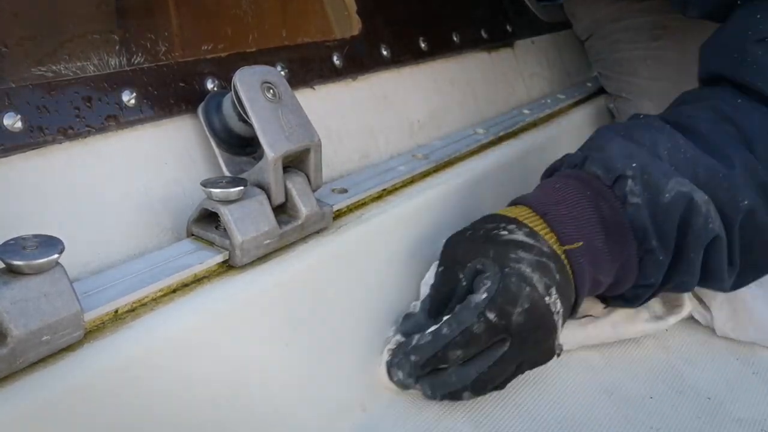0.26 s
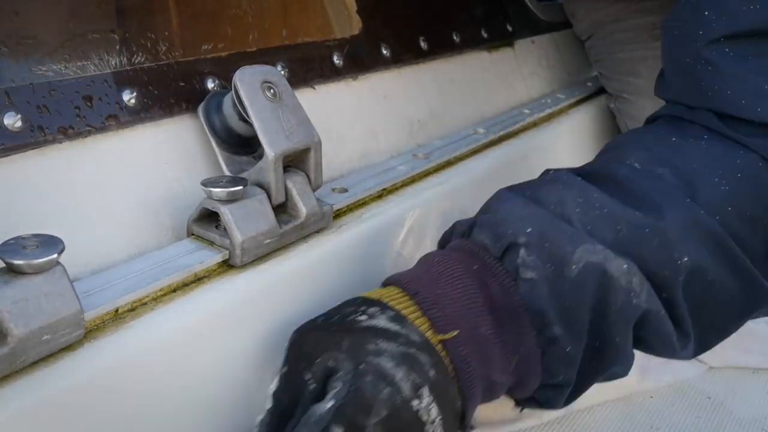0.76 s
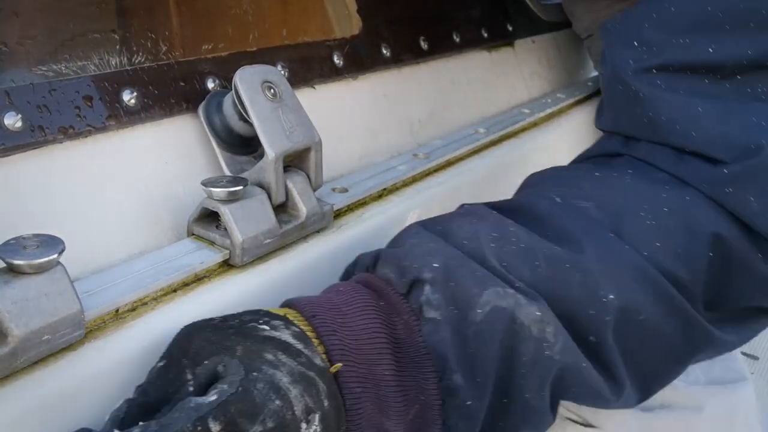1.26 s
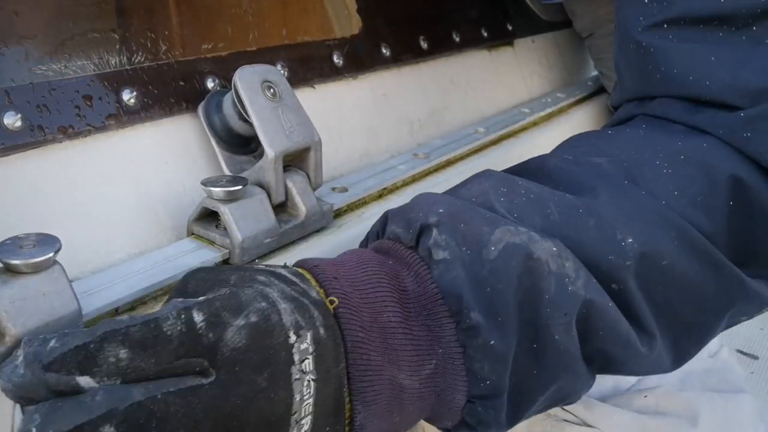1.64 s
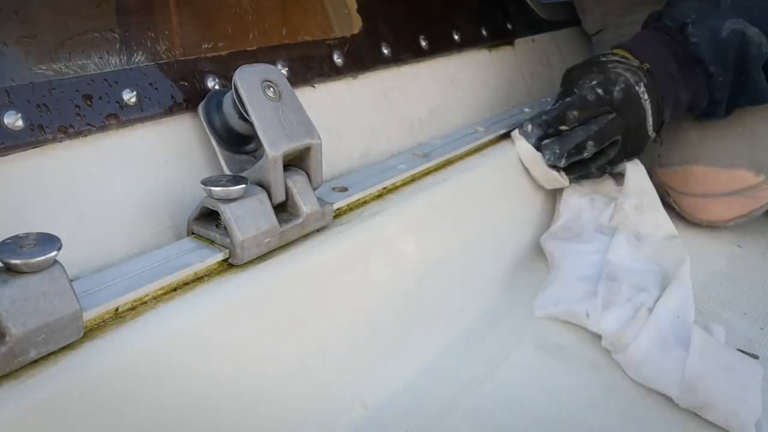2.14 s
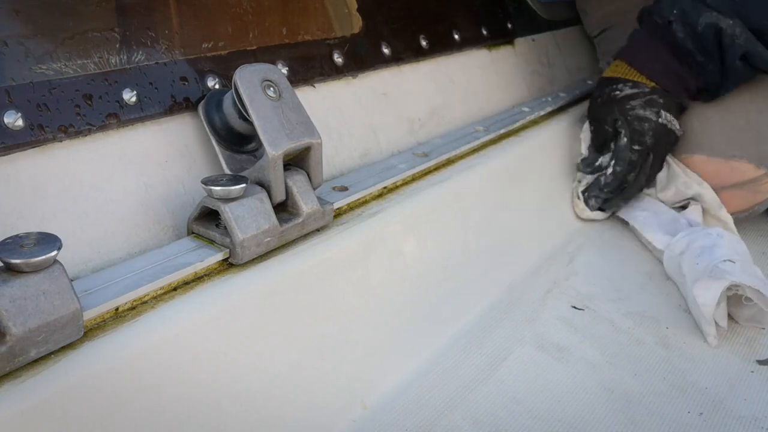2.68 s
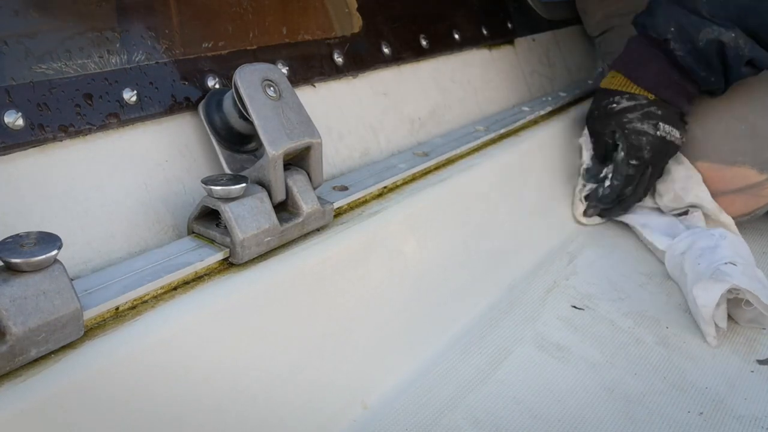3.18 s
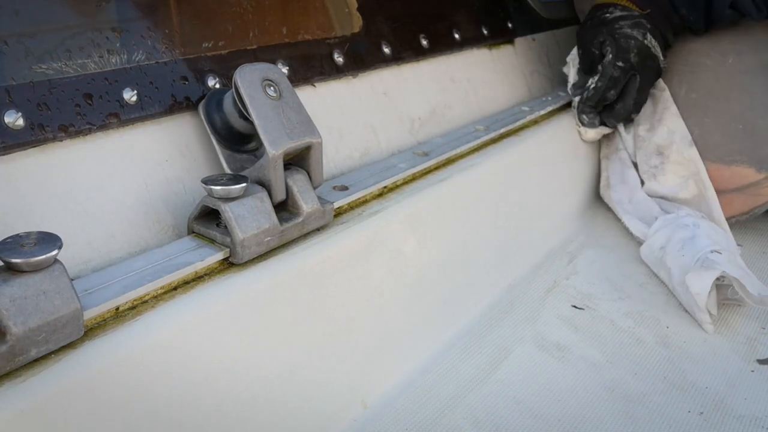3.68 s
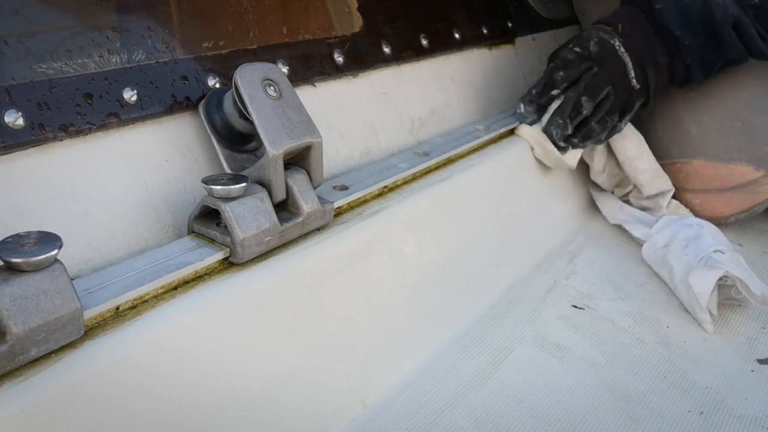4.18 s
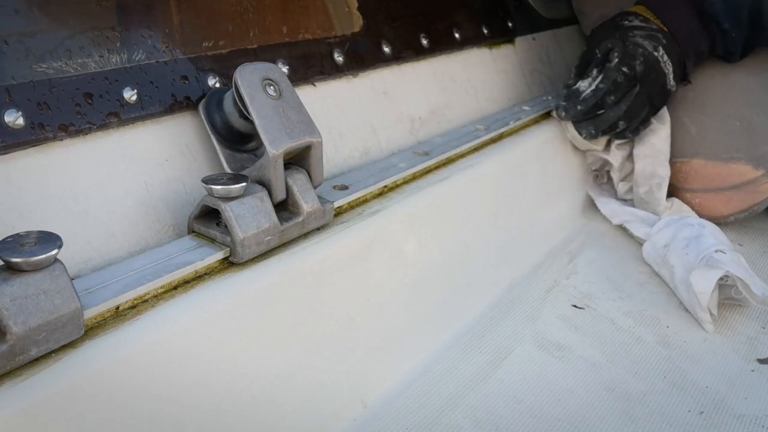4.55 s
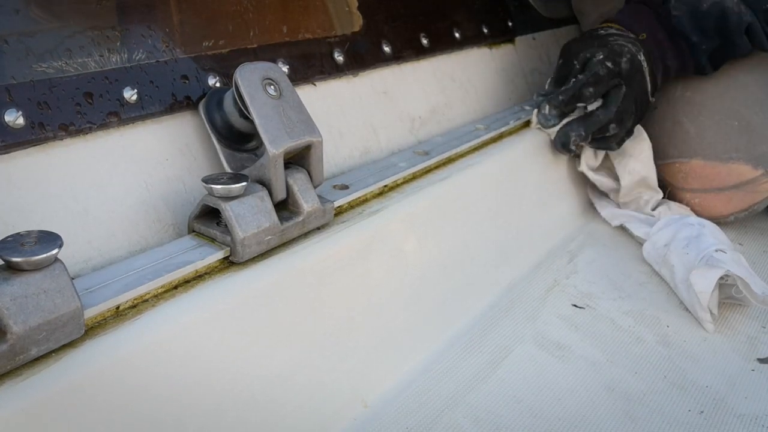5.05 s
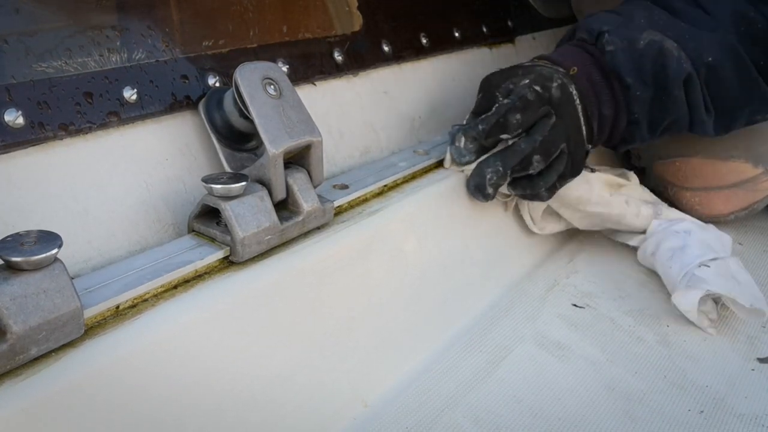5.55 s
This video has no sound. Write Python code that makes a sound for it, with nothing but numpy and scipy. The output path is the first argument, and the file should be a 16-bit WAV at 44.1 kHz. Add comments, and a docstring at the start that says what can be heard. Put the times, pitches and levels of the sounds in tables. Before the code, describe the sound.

A gloved hand rubs a cloth with polishing paste over a boat's fibreglass deck in short, uneven, hissing strokes. The cloth squeaks faintly at first. The hand then bumps the hollow deck, clinks against a metal track and makes one sharp click while the scrubbing carries on. It is heard from very close, outdoors, over a low harbour rumble and light wind on the microphones.

```python
"""On a boat's fibreglass deck in harbour, a small camera's two microphones close to a gloved hand.
The hand scrubs with a cloth and polishing paste: the grit hisses, the cloth drags, the panel groans
and the weave squeaks, mostly on the first strokes. The hand knocks the deck and a metal track.
Hull and harbour rumble underneath, wind buffets the microphones and a few thin whistles pass.
Each microphone port rings at its own pitch."""
import sys
import numpy as np
from scipy import signal
from scipy.fft import rfft, irfft, next_fast_len
from scipy.io import wavfile
from scipy.ndimage import uniform_filter1d, map_coordinates

SR = 44100
rng = np.random.default_rng(int(sys.argv[2]) if len(sys.argv) > 2 else 0)


def to_wav(s):
    """Save 16-bit WAV."""
    ch = np.atleast_2d(s).T  # columns
    pcm = np.round(np.clip(ch, -1, 1) * 32767)  # PCM
    wavfile.write(sys.argv[1], SR, pcm.astype(np.int16))


N = 256656

# hum of the hull, and wind on the microphones, over time: t/s, level/dB
HULL_LEVELS = [(0.0, -55.5), (0.88, -58), (1.13, -54.5), (1.28, -56), (2.04, -57), (3.03, -55.5),
               (3.55, -56.5), (4.97, -55), (5.82, -55.5)]
WIND_LEVELS = [(0, -46.5), (.14, -71), (2.4, -67), (4.1, -61.5), (4.75, -66), (5.02, -55.5), (5.82, -54.5)]
# spectra of that hum and wind: f/Hz, level/dB
HULL_SPECTRUM = [(40, -6), (65, -1.5), (90, 2), (150, -2.5), (280, -6.5), (600, -13.5), (1200, -21.5),
                 (3000, -29.5), (8000, -52), (16000, -69)]
WIND_SPECTRUM = [(10, -30), (25, 1), (50, 1), (90, -6.5), (200, -42.5)]
# strokes of the cloth: start/s, end/s, slowness of start and of stop/(dB per decade) in columns 4 and 5,
# levels at full speed in the rest. In order: start/s, end/s, hiss/dB, start slope, stop slope,
# drag/dB, fine grit/dB re hiss, panel groan/dB, track ring/dB
CLOTH_STROKES = [(-0.034, 0.134, -41, 4.4, 1.5, -51, -3, -60, -99.0),
                 (0.17, 0.395, -38, 17.6, 5.7, -45.5, -4, -63, -99.0),
                 (0.446, 0.62, -40.5, 25, 36, -48.5, -3.5, -55, -99.0),
                 (0.627, 0.907, -37, 15.4, 4.9, -45, -4, -81, -99.0),
                 (0.945, 1.095, -42.5, 3.4, 1.2, -53, -5, -56.5, -99.0),
                 (1.143, 1.277, -39.5, 1.7, 0.68, -56, -4.1, -64, -99.0),
                 (1.308, 1.431, -44, 1.4, 3.8, -59.6, -3, -62, -99.0),
                 (1.477, 1.655, -38.5, 15, 14.7, -60, -8, -57, -99.0),
                 (1.738, 2.305, -39, 9.8, 15.3, -58.5, -2, -67, -99.0),
                 (2.316, 2.538, -38, 29.3, 4.7, -52.5, -5.5, -54, -99.0),
                 (2.573, 2.769, -38.5, 19, 38, -50.5, -4.5, -50.5, -99.0),
                 (2.769, 2.878, -47, 5.5, 16, -54, -21, -56.5, -59),
                 (2.871, 3.044, -43.5, 6, 9.5, -59, -4.5, -63, -56.5),
                 (3.047, 3.267, -40.5, 28, 33, -51.5, -5.5, -54, -62),
                 (3.21, 3.33, -49.7, 20.7, 20.5, -53, -9.7, -58, -58.5),
                 (3.327, 3.48, -47, 26, 11, -66, -5.6, -59, -70),
                 (3.476, 3.73, -47.5, 4, 22, -60.5, -2, -52.5, -60.5),
                 (3.701, 3.819, -42.9, 8.5, 7.1, -58, -4.5, -56, -59),
                 (3.833, 4.024, -44, 46, 48, -61, -3, -68, -65),
                 (4.008, 4.222, -36.5, 48, 7.4, -55.3, -7, -54, -74.0),
                 (4.278, 4.456, -39.5, 23, 21.3, -58.5, -8, -57, -60),
                 (4.47, 4.583, -55, 19, 1.7, -69, -7, -69.6, -70.8),
                 (4.64, 4.763, -49, 18, 4.2, -77, -7, -61, -69),
                 (4.865, 5.091, -40.5, 19.7, 7.2, -58.1, -8, -58, -67),
                 (5.136, 5.253, -40, 21, 9, -68, -7, -56.5, -77),
                 (5.285, 5.585, -36.5, 24.3, 10.5, -51, -3.4, -62, -58.5),
                 (5.639, 5.78, -42, 16.6, 10, -60, -0.5, -64, -75)]
# spectra of paste hiss, cloth drag, fine grit, panel groan and weave squeak: f/Hz, level/dB
HISS_SPECTRUM = [(2500, -17.5), (4500, -4), (6000, -2.5), (9000, 0.5), (12000, -3.5), (16000, 13.5)]
DRAG_SPECTRUM = [(150, -3), (300, -8.5), (600, -10.5), (1200, -9), (2500, -10), (4000, -11), (7000, -28)]
FINE_GRIT_SPECTRUM = [(7000, -23), (9500, -11), (12000, -2.5), (16000, 2.5)]
GROAN_SPECTRUM = [(90, -44), (200, -0.5), (300, 2), (500, -3.5), (900, -22.5)]
SQUEAK_SPECTRUM = [(200, -10), (450, -1), (1000, 0), (1500, -5), (2100, -10), (3000, -18), (5000, -35)]
# the weave skipping over the gel coat: t/s, length/s, first f/Hz, middle f/Hz, last f/Hz, level/dB
WEAVE_SQUEAKS = [(.02, .1, 470, 650, 520, -58), (.22, .13, 385, 480, 375, -55),
                 (.47, .105, 385, 555, 430, -56), (.662, .078, 385, 455, 480, -52),
                 (.75, .14, 485, 510, 385, -52), (3.1, .085, 620, 780, 1000, -63)]
# knocks and ticks of the hand: t/s, snap/dB, shell/dB, deck thud/dB, track/dB
HAND_KNOCKS = [(1.488, -53, -62, -42.5, -73), (1.5622, -55, -32, -57, -62), (1.5649, -42, -28, -29.5, -52),
               (1.5658, -37, -24, -38, -60), (1.5722, -29, -33, -38, -66), (1.874, -60, -59, -41.5, -67),
               (1.9, -41, -48.5, -65, -70), (2.243, -62, -42.5, -70, -76), (2.782, -60, -50, -42, -33),
               (2.7867, -39, -39.5, -40, -29.5), (2.7965, -39, -55, -52, -36), (2.7995, -33, -66, -67, -42),
               (3.1885, -13, -38, -42, -70), (3.1896, -15, -48, -60, -70), (3.767, -49, -43, -71, -61),
               (4.1532, -50, -40.5, -68, -66), (4.208, -56, -42, -63, -64), (5.406, -50, -45.5, -46, -65),
               (5.6615, -40, -60, -66, -68)]
# low modes of the deck: f/Hz, level/dB, time to fall 60 dB/s
DECK_MODES = [(91.5, 3, 0.1), (149.4, -4, 0.16), (300, -8.5, 0.037)]
# modes of the fibreglass shell and of the metal track: f/Hz, width/Hz, level/dB
SHELL_MODES = [(370, 210, -2), (537, 78, 7.5), (744, 92, 3), (1027, 43, 0), (1440, 140, -1),
               (2470, 680, 1.5), (2660, 400, 4), (4000, 1200, -4.5)]
METAL_TRACK_MODES = [(1500, 300, -6), (1790, 100, 8), (3320, 120, -3)]
# thin whistles: t/s, length/s, first f/Hz, middle f/Hz, last f/Hz, level/dB
THIN_WHISTLES = [(3.965, .08, 3000, 3850, 2950, -59.5), (5.11, .045, 8050, 8000, 7900, -68),
                 (5.36, .105, 3620, 3550, 3380, -58), (5.478, .12, 3330, 3290, 3240, -56.5)]
# the hand's place as the left microphone hears it: t/s, left gain/dB, left lag/ms
HAND_PATH = [(0, -2, 0.15), (.75, -1.5, -0.045), (1.65, -0.5, -0.12), (2.2, -3.5, 0.12), (3.2, -3, 0.201),
             (4.5, -3.5, 0.13), (5.82, -2, 0.11)]
# how alike the two microphones hear a noise: f/Hz, likeness/(0 to 1)
MIC_LIKENESS = [(60, 1), (200, 0.97), (700, 0.35), (2000, 0.15), (3500, 0.31), (7000, 0.11), (15000, 0.071)]
# cavities of the microphone ports, left then right: f/Hz, width/Hz, level/dB
PORT_CAVITIES = [(9480, 1470, -3.5), (7866, 900, -1.5)]
# the camera case's colouring of the left port: f/Hz, level/dB
CASE_COLOUR = [(100, 0), (500, -0.5), (1500, -1), (3000, 3), (6000, -1.5), (11000, -4.5), (16000, -5.5)]


def amp(db):
    """Gain for a level in dB."""
    return 10 ** (np.asarray(db) / 20)


def unit(x):
    """x at rms 1."""
    return x / np.sqrt(np.mean(x ** 2) + 1e-20)


def along(points, hz):
    """Read (f/Hz, value) points at hz, on a log frequency axis."""
    f, values = np.transpose(points)
    return np.interp(np.log(hz + 1), np.log(f + 1), values)


def curve(points):
    """Join (t/s, value) points into one value per sample."""
    return np.interp(np.arange(N) / SR, *np.transpose(points))


def wobble(rate):
    """A smooth random curve, rate knots a second."""
    return map_coordinates(rng.standard_normal(int(N * rate / SR) + 4), [np.arange(N) * rate / SR])


def filtered(x, response):
    """x through a complex frequency response."""
    size = next_fast_len(N + SR // 4)
    return irfft(rfft(x, size) * response(np.fft.rfftfreq(size, 1 / SR)), size)[..., :N]


def resonances(modes, hz):
    """Response at hz of a body's modes, alternating in sign."""
    return sum((-1) ** k * amp(db) * 1j * hz * width / (centre ** 2 - hz ** 2 + 1j * hz * width)
               for k, (centre, width, db) in enumerate(modes))


def ports(hz):
    """Each microphone port is a small cavity: flat below, a peak at its pitch. The case colours the left."""
    left, right = [amp(db) * centre ** 2 / (centre ** 2 - hz ** 2 + 1j * hz * width)
                   for centre, width, db in PORT_CAVITIES]
    return np.array([left * amp(along(CASE_COLOUR, hz)), right])


def noise(spectrum, patchy_db, grit_db):
    """Two noises, patchy in time and pitch and gritty at the millisecond; rms 1 behind the ports."""
    gritty = amp(grit_db * wobble(600)) * rng.standard_normal((2, N))
    frames = signal.stft(gritty, nperseg=512)[2]
    patches = uniform_filter1d(rng.standard_normal(frames.shape[1:]), 8, axis=0)
    patches = unit(uniform_filter1d(patches, 8, axis=1))
    pair = signal.istft(frames * amp(patchy_db * patches), nperseg=512)[1][:, :N]
    pair = filtered(pair, lambda hz: amp(along(spectrum, hz)))
    return pair / np.std(filtered(pair, ports))


def paired(pair, likeness):
    """The left microphone hears a share of the right one's sound, and its own for the rest."""
    def weights(hz):
        share = np.clip(along(likeness, hz), 0, 1)
        return [np.sqrt(1 - share ** 2), share]
    return np.array([filtered(pair, weights).sum(axis=0), pair[1]])


def arc(start_s, length_s, first_hz, middle_hz, last_hz, fade_s):
    """Pitch on a parabola through three points, and a gate with soft ends."""
    t = np.arange(N) / SR - start_s
    parabola = np.polyfit([0, .5, 1], [first_hz, middle_hz, last_hz], 2)
    hz = np.polyval(parabola, np.clip(t / length_s, 0, 1))
    return hz, np.clip(np.minimum(t, length_s - t) / fade_s, 0, 1)


def harbour():
    """The hull hums with water and far noise."""
    level_db = curve(HULL_LEVELS) + wobble(4)
    return amp(level_db) * paired(noise(HULL_SPECTRUM, patchy_db=1.3, grit_db=-0.5), MIC_LIKENESS)


def wind():
    """Wind buffets each port in its own way, the left one harder."""
    level_db = curve(WIND_LEVELS) + 2.4 * wobble(4.7) + np.array([[5.5], [0]])
    return amp(level_db) * paired(noise(WIND_SPECTRUM, patchy_db=0, grit_db=1.5), [(30, 0.25)])


def stroke_gain(level_db, swing, rest_db):
    """A layer swells and fades with each stroke's speed; between strokes the cloth creeps at rest_db."""
    head_start = 0.055  # the cloth breaks loose as if this share of the stroke had passed
    settle_s = 0.0059  # the rustle dies away after the hand stops
    t, power = np.arange(N) / SR, amp(2 * rest_db)
    for (start, end, _, rise, fall, *_), db in zip(CLOTH_STROKES, level_db):
        progress = np.clip((t - start) / (end - start), 0, 1 - 1e-9)
        crest = max((rise - head_start * fall) / (rise + fall), 0)
        rise_db = rise * np.log10((progress + head_start) / (crest + head_start))
        fall_db = fall * np.log10((1 - progress) / (1 - crest))
        moving = (t > start) & (t < end)
        power = power + moving * amp(2 * (db + swing * (rise_db + fall_db)))
    decay = np.exp(-1 / (settle_s * SR))
    return np.sqrt(signal.lfilter([1 - decay], [1, -decay], power))


def rubbing():
    """Paste grit hisses; the cloth drags on the panel, which groans, and makes the track sing."""
    hiss_db, _, _, drag_db, fine_db, groan_db, track_db = np.transpose(CLOTH_STROKES)[2:]
    pressure = wobble(25.12)
    hiss = stroke_gain(hiss_db, swing=0.81, rest_db=-61) * amp(0.5 * pressure)
    hiss = hiss * noise(HISS_SPECTRUM, patchy_db=2, grit_db=0.5)
    drag = stroke_gain(drag_db, swing=0.99, rest_db=-63.5) * amp(0.27 * pressure)
    drag = drag * noise(DRAG_SPECTRUM, patchy_db=3.5, grit_db=1.5)
    fine_grit = stroke_gain(hiss_db + fine_db, swing=1, rest_db=-69) * amp(1.3 * pressure)
    fine_grit = fine_grit * noise(FINE_GRIT_SPECTRUM, patchy_db=1.5, grit_db=1.5)
    groan = stroke_gain(groan_db, swing=0.5, rest_db=-75) * amp(2.5 * wobble(25))
    groan = groan * noise(GROAN_SPECTRUM, patchy_db=2, grit_db=-0.5)
    metal = unit(filtered(rng.standard_normal((2, N)), lambda hz: resonances(METAL_TRACK_MODES, hz)))
    track = stroke_gain(track_db, swing=0.067, rest_db=-95) * amp(2.4 * wobble(30))
    track = track * paired(metal, [(1800, 0.54)])
    return paired(hiss + fine_grit + drag + groan, MIC_LIKENESS) + amp([[-5], [0]]) * track


def squeaks():
    """The weave skips over the gel coat, one slip per thread: uneven pulses at a gliding pitch."""
    out = np.zeros(N)
    for *glide, db in WEAVE_SQUEAKS:
        hz, gate = arc(*glide, fade_s=.02)
        threads = np.cumsum(hz * (1 + .02 * wobble(150) + .025 * wobble(35))) / SR
        slips = np.diff(np.floor(threads), prepend=0) * amp(2.5 * rng.standard_normal(N))
        out += gate * amp(db + 3 * wobble(35)) * slips * SR / hz / np.sqrt(2)
    return filtered(out, lambda hz: amp(along(SQUEAK_SPECTRUM, hz)))


def knocks():
    """Every contact is a bright snap, a thud in the deck, a blow on the shell and a ring of the track."""
    direct, blows = np.zeros(N + SR), np.zeros((2, N))
    t = np.arange(SR // 3) / SR
    treble = signal.butter(3, 7600, "high", fs=SR, output="sos")  # a tiny source radiates mostly treble
    thud_attack = 1 - np.exp(-t / 0.0026)
    for start_s, snap_db, shell_db, thud_db, track_db in HAND_KNOCKS:
        onset = round(start_s * SR)
        crack = (t == 0) + 0.3 * rng.standard_normal(len(t)) * amp(-60 * t / 0.004)
        snap = 3 * amp(snap_db) * signal.sosfilt(treble, np.diff(crack, prepend=0))
        thud = sum(amp(thud_db + db - 60 * t / t60) * np.sin(2 * np.pi * hz * t)
                   for hz, db, t60 in DECK_MODES)
        direct[onset:onset + len(t)] += snap + thud * thud_attack
        blows[:, onset] = amp([shell_db, track_db]) * SR / (2 * np.pi * 200)
    shell = filtered(blows[0], lambda hz: resonances(SHELL_MODES, hz))
    track = filtered(blows[1], lambda hz: resonances(METAL_TRACK_MODES, hz))
    return direct[:N] + shell + amp([[-4], [0]]) * track


def whistles():
    """Brief, thin tones, unsteady and slightly raspy."""
    out = np.zeros(N)
    for *glide, db in THIN_WHISTLES:
        hz, gate = arc(*glide, fade_s=.015)
        cycles = np.cumsum(hz * (1 + .014 * wobble(200))) / SR
        out += gate * np.sqrt(2) * amp(db + 3 * wobble(60)) * np.sin(2 * np.pi * cycles)
    return out


def from_hand(pair):
    """Level and arrival time at the left microphone follow the hand."""
    hz, t, frames = signal.stft(pair[0], SR, nperseg=256)
    path_s, gain_db, lag_ms = np.transpose(HAND_PATH)
    gain = amp(np.interp(t, path_s, gain_db))
    delay = np.exp(-2j * np.pi * hz[:, None] * np.interp(t, path_s, lag_ms) / 1000)
    left = signal.istft(frames * gain * delay, SR, nperseg=256)[1][:N]
    return np.array([left, pair[1]])


def scene():
    """Close sounds, and the thin whistles with them, reach the microphones from the hand's side, over the
    harbour and the wind."""
    brief_sounds = squeaks() + knocks() + whistles()
    return from_hand(rubbing() + brief_sounds) + harbour() + wind()


def record(dry):
    """The camera's microphones: port resonances, then the band limit."""
    top_hz = 15900
    return filtered(dry, lambda hz: ports(hz) * (hz < top_hz))


dry = scene()
out = record(dry)
to_wav(out)
```